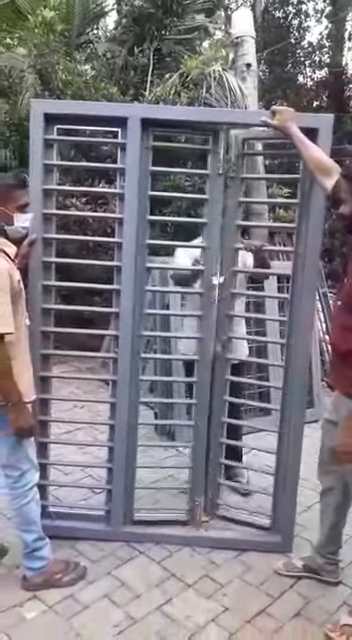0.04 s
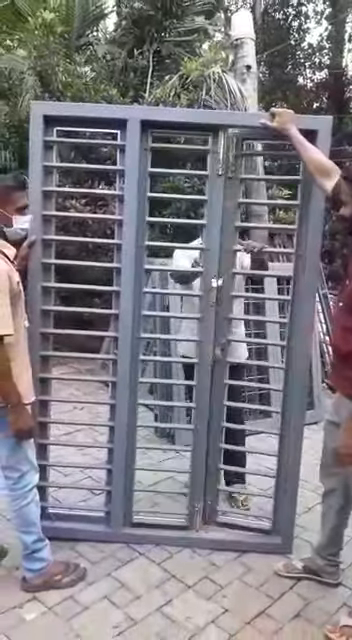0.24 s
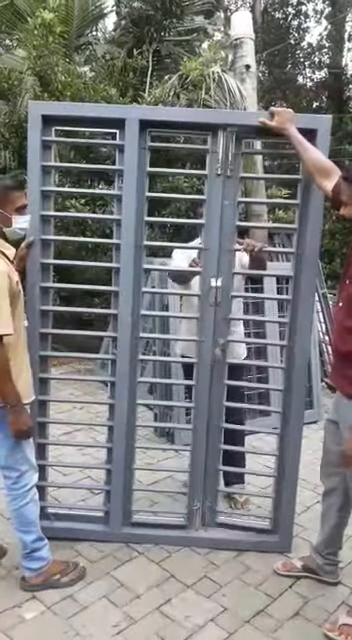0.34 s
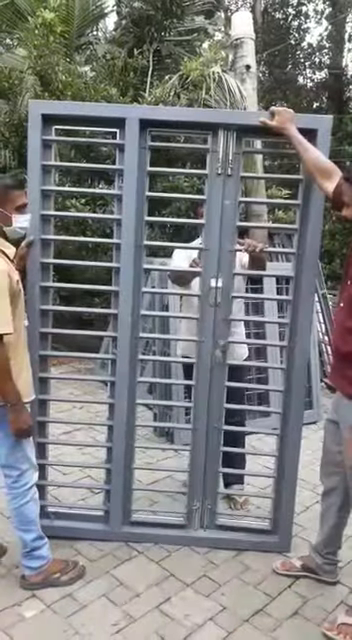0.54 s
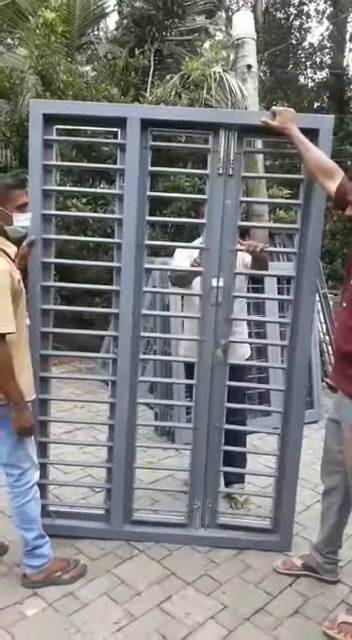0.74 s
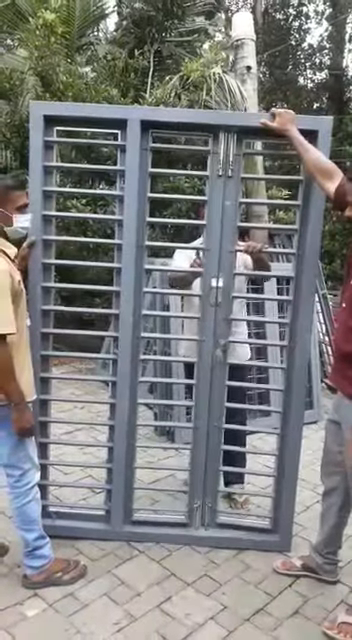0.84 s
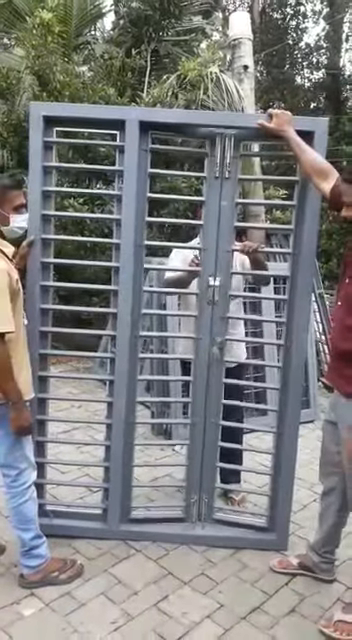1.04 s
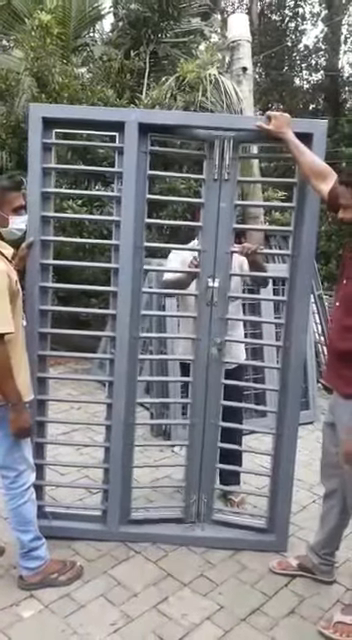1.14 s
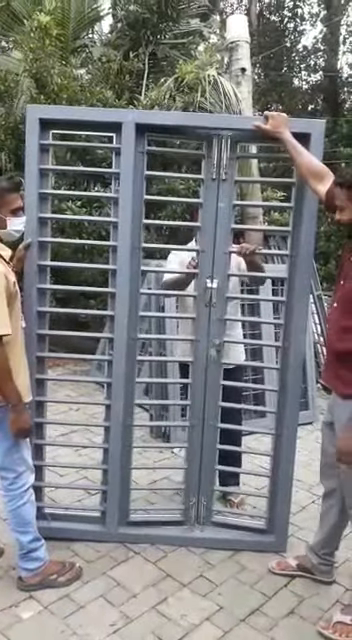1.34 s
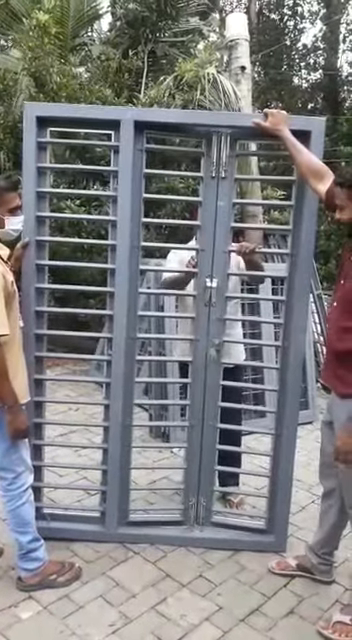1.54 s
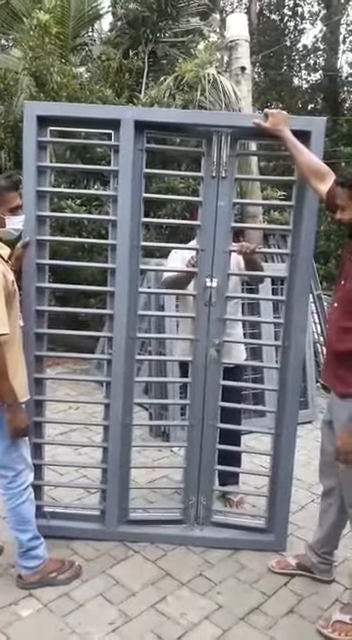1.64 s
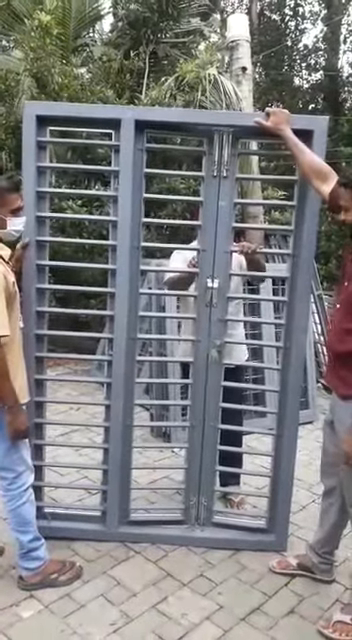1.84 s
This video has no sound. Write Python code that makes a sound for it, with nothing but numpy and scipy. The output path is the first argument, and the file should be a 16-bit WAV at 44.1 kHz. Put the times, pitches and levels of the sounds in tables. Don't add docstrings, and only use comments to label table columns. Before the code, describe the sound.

Barred steel shutter leaves slam shut with two loud rattling metal clanks, then lighter knocks outdoors

```python
import sys
import numpy as np
from scipy import signal
from scipy.fft import rfft, irfft, next_fast_len
from scipy.io import wavfile
from scipy.ndimage import map_coordinates

SR = 44100
rng = np.random.default_rng(int(sys.argv[2]) if len(sys.argv) > 2 else 0)


def inscribe(sig):
    pcm = np.round(np.clip(np.atleast_2d(sig).T, -1, 1) * 32767)
    wavfile.write(sys.argv[1], SR, pcm.astype(np.int16))


def boost_factor(decibels):
    exponent = np.asarray(decibels, float) / 20
    return 10 ** exponent


N = 83790
RING_SIZE = SR * 3 // 5

# start_s, bars_level_db, tubes_over_bars_db, latch_over_bars_db, chatter_s
SLAM_CONTACTS = [(-.03, -42, -20, -33, 0.009), (0.236, -14.5, -4, -32, 0.0082),
                 (0.244, -12, -5.5, -17.5, 0.0084), (0.31, -23, -10.5, -37, 0.0033),
                 (0.334, -25.5, -29, -12.5, 0.025), (0.367, -39.5, -11, 5, 0.0097),
                 (0.5064, -13.5, -10, -14, 0.0066), (0.515, -11.5, -6, -19, 0.0082),
                 (0.532, -14.5, -6, -11.5, 0.0053), (.578, -22.5, 2.5, -15, 0.02),
                 (0.611, -25.5, 0.5, -22, 0.0044), (.647, -21.5, -6, -25, 0.014),
                 (0.716, -37, -18, -28, 0.021), (0.805, -43.5, -11, -14.5, 0.0055),
                 (0.809, -35, -32, -31, .008), (0.86, -44, 6, -23.5, .02), (1.285, -42.5, 5, -26, 0.012),
                 (1.367, -36, -2, -22, 0.0084), (1.571, -37, -1, -20, .016),
                 (1.582, -23, -10.5, -28, 0.0029), (1.587, -27.5, -5.5, -14, 0.002),
                 (1.619, -29, -4, -13, 0.011), (1.671, -34, -6, -13, .008), (1.726, -38, -14, -20, 0.018)]
# frequency_hz, density_db (per Hz)
BAR_SPECTRUM = [(220, -9.5), (380, -3.5), (615, -2), (1340, -2.5), (2030, 2.5), (7140, -21), (8460, -20),
                (10500, -34.5), (15500, -33)]
# frequency_hz, t60_s
BAR_DECAY = [(400, 0.2), (1000, 0.23), (2500, 0.28), (5000, 0.23), (10000, 0.36), (15000, 0.25)]
# pitch_hz, level_db, t60_s
LOUD_BAR_MODES = [(565.7, -7, 0.17), (602.5, -2, 0.26), (638.4, 3, 0.26), (1047, 5.5, 0.22),
                  (1175, -4.5, 0.29), (1381, 3, 0.12), (1530, -28, 0.085), (1895, 0, 0.37),
                  (1900, -7.5, 0.075), (2230, -21, 0.15), (2287, 4.5, 0.17), (2600, 3, 0.38),
                  (2920, 5.5, 0.12), (3780, -3, 0.12)]
# pitch_hz, level_db, t60_s
TUBE_MODES = [(150, -17.5, 0.78), (189.7, -7.5, 0.19), (238.5, -21, 0.11), (275.4, -1, 0.51),
              (306.2, 4, 0.35), (338, -6, 0.47), (398, -10, 0.34)]
# frequency_hz, density_db (per Hz)
LATCH_SPECTRUM = [(9500, -22), (11000, -9), (12500, 1), (14500, -2), (15800, -6)]
# start_s, level_db, pitch_hz, width_hz,
# t60_s
BAR_TAPS = [(0, -37.5, 2330, 1300, .3), (0.72, -25.5, 2480, 960, 0.16), (.818, -28, 1880, 200, 0.062),
            (.818, -31.5, 810, 1100, 0.09), (0.93, -32, 2400, 1160, 0.065), (1.285, -42.5, 615, 260, 0.26),
            (1.291, -42, 1050, 250, 0.22), (.99, -53, 3680, 38, 0.36), (1.621, -24.5, 1910, 78, .15),
            (1.527, -44, 650, 210, .15), (1.535, -45, 1010, 300, 0.34), (1.7165, -25.5, 2360, 1180, 0.16),
            (1.876, -34.5, 2310, 1100, 0.21), (.5075, -16.5, 4250, 6500, 0.22),
            (1.5835, -18.5, 2950, 2000, 0.1), (1.567, -43.5, 3500, 7300, 0.27), (0.17, -48, 490, 310, 0.44),
            (.82, -38.5, 672, 83, 0.23)]
# frequency_hz, t60_s
YARD_DECAY = [(200, 1), (2000, 0.23), (8000, 1), (15000, 0.11)]
# time_s, level_db
RUB_LEVEL = [
    (1.0, -56.5),
    (1.1, -49),
    (1.2, -43.5),
    (1.27, -46),
    (1.35, -71),
    (1.5, -53.5),
]
# frequency_hz, density_db (per Hz)
RUB_SPECTRUM = [(1450, -15), (1680, 1), (2000, -7.5), (3000, -3.5), (6000, -14.5), (10000, -20.5),
                (13000, -19.5), (15800, -20)]
CHIRP_LEVELS = [-34.5, -26.5, -37, -41, -44, -32]
# centre_hz, width_hz, level_db
CHORUS_BANDS = [(2276, 38, -51.5), (2305, 216, -49.5), (4470, 270, -60.5), (6830, 350, -65.5),
                (8886, 480, -43), (9210, 48, -53), (11400, 300, -74), (13300, 400, -71)]
# time_s, level_db
CHORUS_LEVEL = [(0.0, 3), (1.9, 0.5)]
# frequency_hz, density_db (per Hz)
AIR_SPECTRUM = [(25, -18.5), (60, -4), (200, -4.5), (300, -9.5), (500, -13), (1100, -17), (3000, -22.5),
                (15800, -45)]
# time_s, level_db
AIR_LEVEL = [(0, -49.5), (.2, -52), (.9, -44.5), (1.03, -53.5), (1.25, -51.5), (1.3, -40), (1.45, -49.5),
             (1.7, -48.5), (1.9, -46)]


def shutters():
    lead = SR // 20
    out = np.zeros(N + 2 * SR)
    t = np.arange(RING_SIZE) / SR
    for start_s, level_db, tube_db, latch_db, chatter_s in SLAM_CONTACTS:
        bars = bar_modes(chatter_s) + boost_factor(-5) * ringing(LOUD_BAR_MODES)
        latch = boost_factor(latch_db) * latch_fizz(chatter_s)
        chatter = boost_factor(4 * wobble(340)[:len(t)] * np.exp(-t / (2 * chatter_s)))
        clang_rise = 1 - np.exp(-t / (0.2 * chatter_s))
        clang = (bars + latch) * chatter * clang_rise

        rattle = boost_factor(tube_db + 2 * wobble(30)[:len(t)])
        tube_rise = 1 - np.exp(-t / 0.0027)
        boom = rattle * ringing(TUBE_MODES) * tube_rise

        first = lead + round(start_s * SR)
        out[first:first + len(t)] += boost_factor(level_db) * (clang + boom)
    return out[lead:lead + N]


def bar_modes(chatter_s):
    mode_gap_hz = 44.99
    peaks_db = 2 * rng.standard_normal(800)

    def gain(hz):
        own_db = map_coordinates(peaks_db, [hz / mode_gap_hz])
        return boost_factor(along(BAR_SPECTRUM, hz) + own_db) * (hz > 200)

    return dying(gain, lambda hz: along(BAR_DECAY, hz), after_db=-16.5, hold_s=chatter_s)


def latch_fizz(chatter_s):
    gain = lambda hz: boost_factor(along(LATCH_SPECTRUM, hz)) * (hz > 9000)
    return dying(gain, lambda hz: 0.084 + 0 * hz, hold_s=chatter_s / 2)


def taps():
    out = np.zeros(N + SR)
    for start_s, level_db, pitch_hz, width_hz, t60_s in BAR_TAPS:
        gain = lambda hz: 1 / (1 + (2 * (hz - pitch_hz) / width_hz) ** 4)
        ring = dying(gain, lambda hz: t60_s + 0 * hz, size=SR // 2)
        rise = np.minimum(np.arange(len(ring)) / (0.001 * SR), 1)
        first = round(start_s * SR)
        out[first:first + len(ring)] += boost_factor(level_db) * ring * rise
    return out[:N]


def ringing(modes):
    pitch_hz, level_db, t60_s = np.transpose(modes)
    t = np.arange(RING_SIZE)[:, None] / SR
    phase, strength = rng.standard_normal((2, len(pitch_hz)))
    sines = np.sin(2 * np.pi * pitch_hz * t + 0.45 * phase) * boost_factor(-60 * t / t60_s)
    return sines @ boost_factor(level_db + 3 * strength) / np.linalg.norm(boost_factor(level_db))


def dying(gain, t60, after_db=-99, hold_s=0, size=RING_SIZE):
    hz, t, z = signal.stft(rng.standard_normal(size), SR, nperseg=128)
    fall_db = -60 * np.maximum(t - hold_s, 0) / t60(hz)[:, None]
    fade = np.sqrt(boost_factor(2 * fall_db) + boost_factor(2 * after_db + 2 * fall_db / 3.48))
    noise = signal.istft(z * fade, SR, nperseg=128)[1][:size]
    gain_rms = np.sqrt(np.mean(gain(np.linspace(0, SR / 2, 2000)) ** 2))
    return filtered(noise, gain) / gain_rms


def yard(x):
    hz, t, z = signal.stft(rng.standard_normal(SR), SR, nperseg=256)
    fade = boost_factor(-60 * t / along(YARD_DECAY, hz)[:, None])
    tail = signal.istft(z * fade, SR, nperseg=256)[1]
    delayed = np.pad(x, (500, 0))
    return signal.fftconvolve(delayed, tail / np.linalg.norm(tail))[:N]


def rubbing():
    return boost_factor(curve(RUB_LEVEL) + 0.88 * wobble(38.9)) * hiss(RUB_SPECTRUM)


def cricket():
    first_s, every_s, length_s = 0.197, 0.335, 0.048
    pitch_hz, rise_hz, strokes_hz = 8710, 23.6, 247
    t = np.arange(N) / SR
    k = np.arange(len(CHIRP_LEVELS))[:, None]
    u = (t - first_s - every_s * k) / length_s
    envelope = np.clip(4 * np.minimum(u + 0.5, 0.5 - u), 0, 1)
    tones = envelope * np.sin(2 * np.pi * (pitch_hz + rise_hz * k) * t + 0.5 * wobble(98))
    pulses = 1 + 0.32 * np.sin(2 * np.pi * strokes_hz * t + 0.4 * wobble(60))
    return boost_factor(CHIRP_LEVELS) @ tones * pulses


def chorus():
    out = np.zeros(N)
    for centre_hz, width_hz, level_db in CHORUS_BANDS:
        gain = lambda hz: 1 / (1 + (2 * (hz - centre_hz) / (2 * width_hz)) ** 4)
        band = unit(filtered(rng.standard_normal(N), gain))
        out += boost_factor(level_db + 0.89 * wobble(14.8)) * band
    return boost_factor(curve(CHORUS_LEVEL)) * out


def air():
    return boost_factor(curve(AIR_LEVEL) + 3.6 * wobble(6.14)) * hiss(AIR_SPECTRUM)


def hiss(points):
    gain = lambda hz: boost_factor(along(points, hz)) * (hz > 0.8 * points[0][0])
    return unit(filtered(rng.standard_normal(N), gain))


def filtered(x, response):
    m = next_fast_len(len(x) + 8192)
    return irfft(rfft(x, m) * response(np.fft.rfftfreq(m, 1 / SR)), m)[:len(x)]


def wobble(rate):
    return map_coordinates(rng.standard_normal(400), [np.arange(N) * rate / SR])


def curve(rows):
    return np.interp(np.arange(N) / SR, *np.transpose(rows))


def along(points, hz):
    f, v = np.transpose(points)
    return np.interp(np.log(hz + 1), np.log(f + 1), v)


def unit(x):
    return x / np.sqrt(np.mean(x ** 2) + 1e-20)


def scene():
    steel = shutters() + taps()
    echoes = boost_factor(-20) * yard(steel)
    return (steel + echoes + rubbing() + cricket() + chorus() + air())[None]


def roll_off(x):
    return signal.sosfilt(signal.butter(12, 15860, fs=SR, output="sos"), x)


def record(dry):
    low_cut_hz, ceiling, top_hz = 109, 1.02, 15850
    x = filtered(dry[0], lambda hz: (1j * hz / (low_cut_hz + 1j * hz)) ** 2)
    x = x / (1 + abs(x / ceiling) ** 10) ** (1 / 10)
    mix = filtered(x, lambda hz: hz < top_hz)[None]
    return roll_off(mix)


dry = scene()
out = record(dry)
inscribe(out)
```